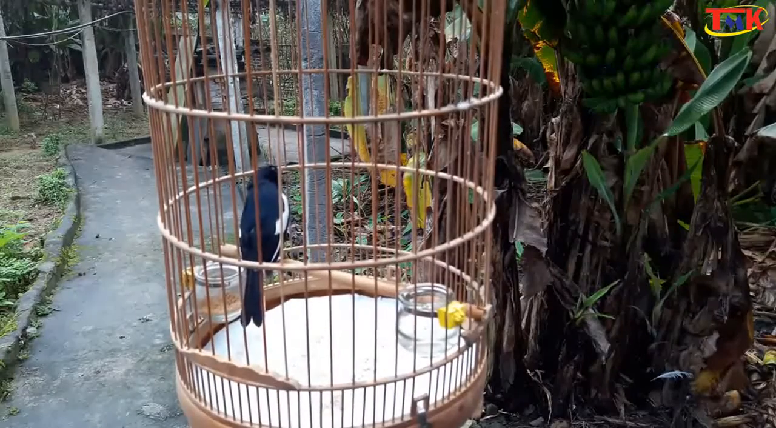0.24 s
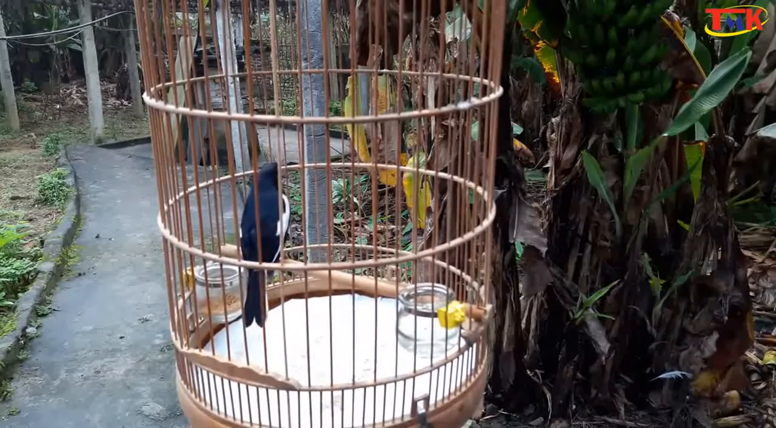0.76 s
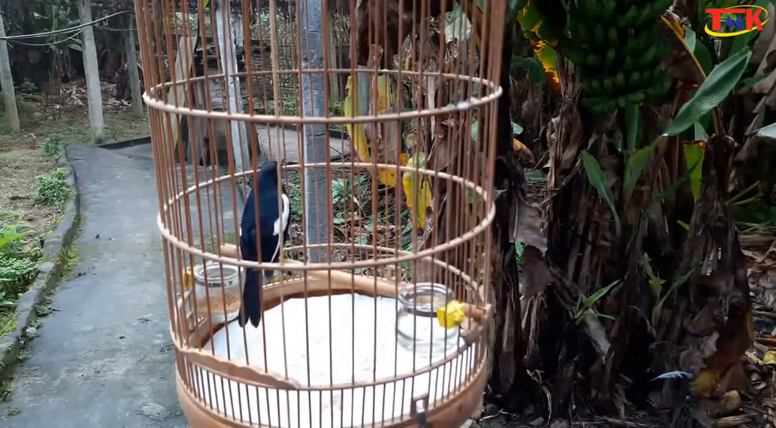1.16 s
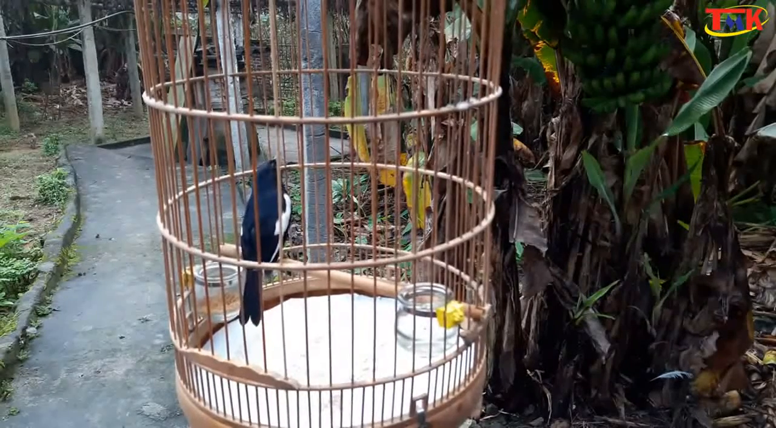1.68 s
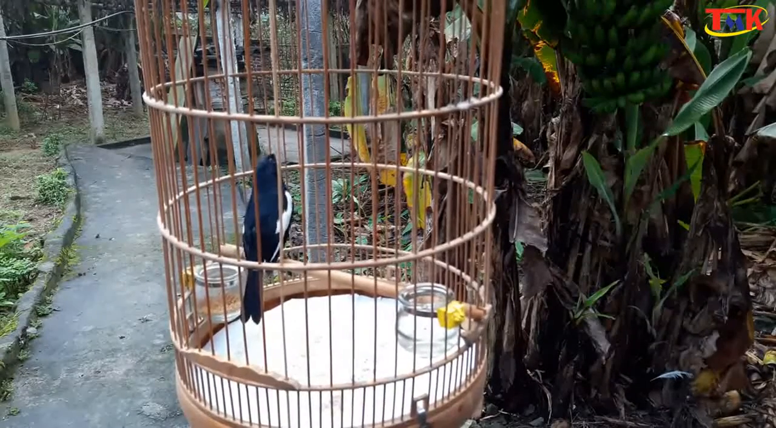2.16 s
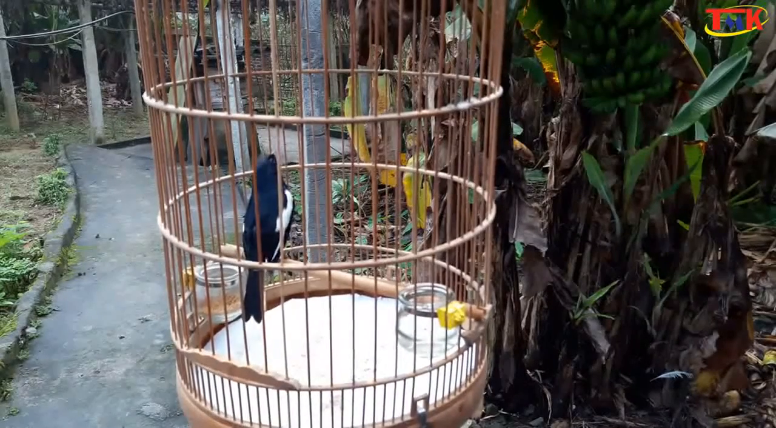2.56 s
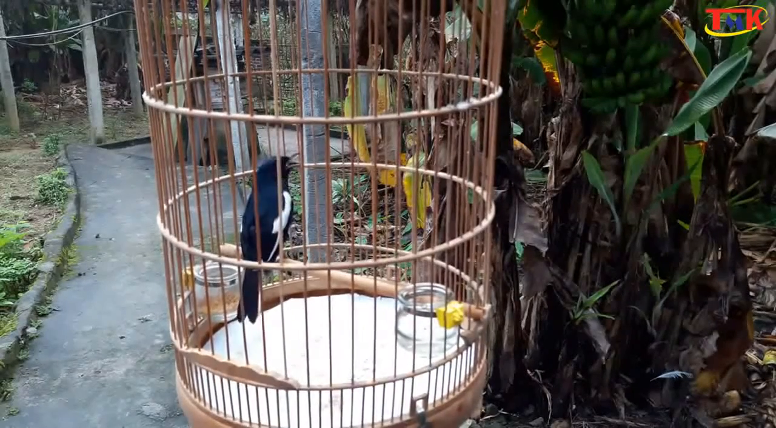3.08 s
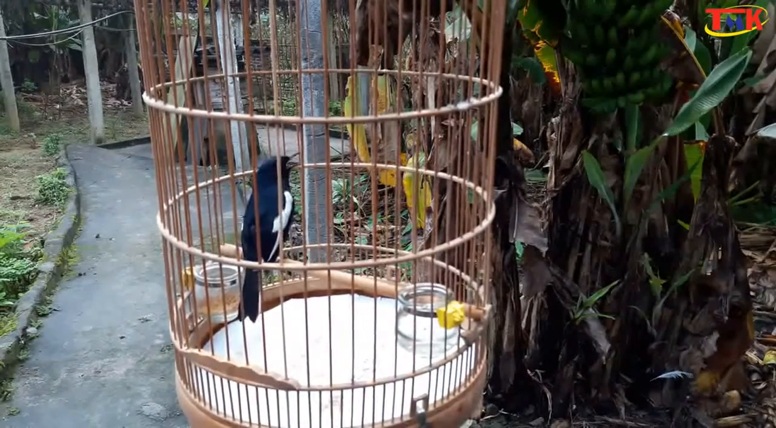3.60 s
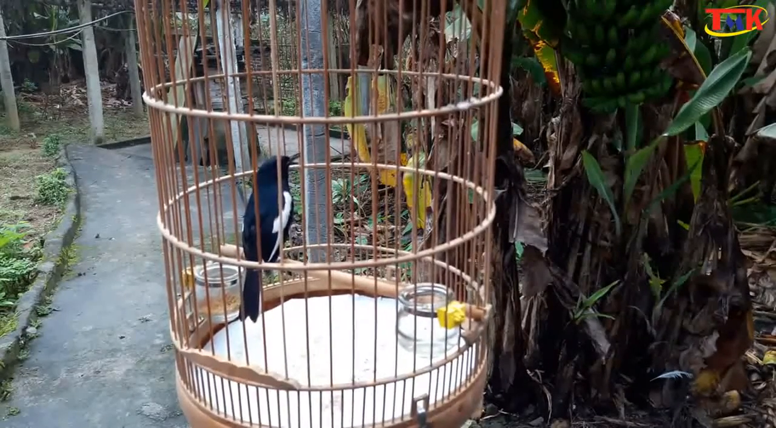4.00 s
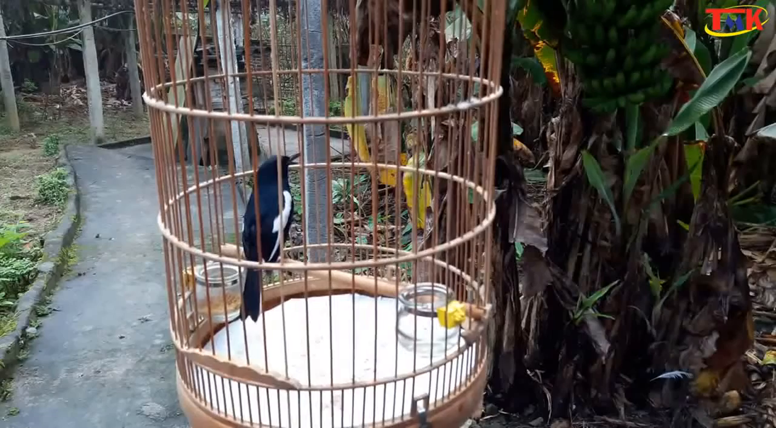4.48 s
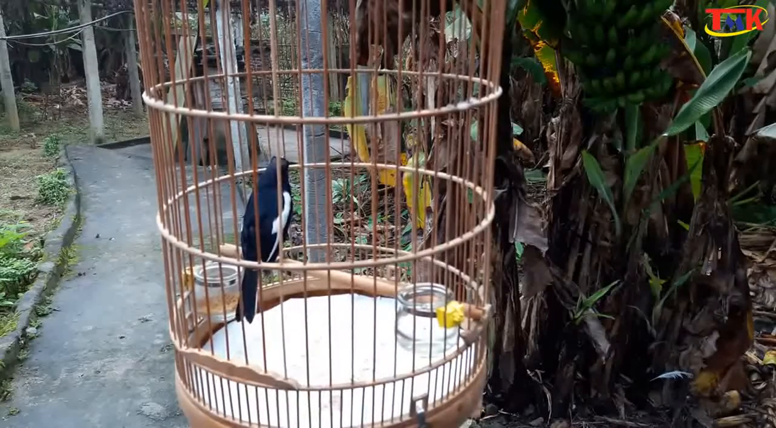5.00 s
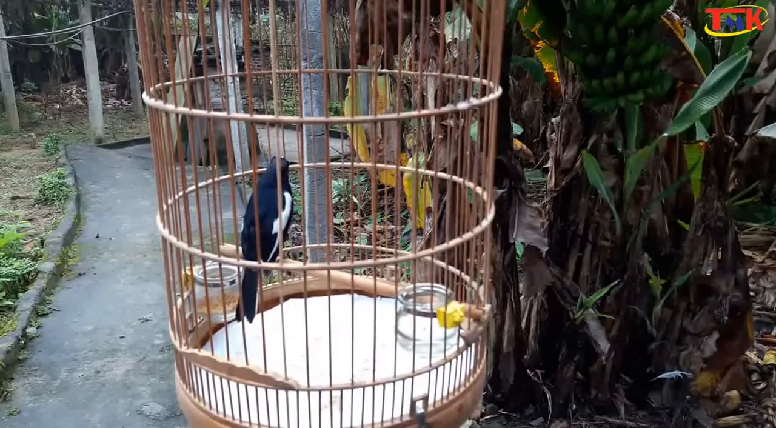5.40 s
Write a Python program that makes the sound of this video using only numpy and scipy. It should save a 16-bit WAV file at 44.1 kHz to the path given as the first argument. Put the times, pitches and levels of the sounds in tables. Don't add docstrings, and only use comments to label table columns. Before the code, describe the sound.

A caged songbird close by sings quick, piercing whistled phrases with raspy turns in a quiet garden, then abruptly stops, leaving faint rumble and hiss.

```python
import sys
import numpy as np
from scipy import signal
from scipy.fft import rfft, irfft
from scipy.io import wavfile
from scipy.ndimage import uniform_filter1d, map_coordinates

SR = 44100
rng = np.random.default_rng(int(sys.argv[2]) if len(sys.argv) > 2 else 0)


def convert_level_to_amplitude(level_db):
    exponent = np.asarray(level_db, float) / 20
    return 10 ** exponent


def wrap_up_sound(samples):
    columns = np.atleast_2d(samples).T
    tamed = np.clip(columns, -1, 1)
    steps = np.round(tamed * 32767).astype(np.int16)
    wavfile.write(sys.argv[1], SR, steps)


N = 249165

LEAP_HIGH = [
    [(.041, 4108, -44), (.067, 4187, -27), (.09, 4220, -14), (.111, 4294, -9), (.137, 4396, -10),
     (.144, 4917, -20.5)],
    [(.144, 4866, -17.5), (.149, 5608, -26.5), (.158, 6400, -33.5), (.168, 5131, -35.5), (.176, 3400, -22),
     (.184, 2720, -26), (.2, 3888, -22.5), (.209, 4418, -18.5), (.219, 5409, -38)],
]
LEAP_LOW = [
    [(0, 2450, -36.5), (.007, 3000, -15), (.027, 3170, -13.5), (.052, 3270, -7), (.066, 3280, -9),
     (.077, 3340, -20.5), (.086, 3590, -17), (.095, 4030, -24.5)],
    [(.172, 2380, -31), (.19, 2600, -31.5), (.202, 2850, -24), (.211, 3090, -20.5), (.227, 3400, -9),
     (.242, 3090, -14.5), (.254, 2800, -22.5), (.263, 2300, -26.5)],
]
STEP_HIGH = [
    [(.03, 4096, -47), (.056, 4020, -32.5), (.08, 4123, -28), (.1, 3967, -12.5), (.135, 3985, -11),
     (.165, 4015, -13), (.183, 4110, -13), (.194, 4374, -18.5)],
    [(.194, 4429, -17.5), (.207, 5250, -29.5), (.217, 4358, -18), (.226, 3040, -23), (.233, 2544, -27.5),
     (.243, 3050, -18.5), (.254, 3790, -15), (.262, 4227, -22), (.269, 5222, -21.5)],
    [(.284, 3730, -19), (.293, 2996, -10.5), (.304, 3738, -24), (.311, 4852, -36.5)],
]
STEP_LOW = [
    [(0, 2556, -35.5), (.008, 3030, -11), (.021, 3124, -11), (.043, 3192, -9.5), (.069, 3201, -7.5),
     (.08, 3150, -15), (.094, 2935, -27)],
    [(.245, 2981, -16), (.263, 2919, -25), (.277, 3098, -16), (.286, 2823, -15.5), (.294, 3012, -19.5)],
]
STAIR_HIGH = [
    [(.057, 3450, -42.5), (.065, 4014, -9.5), (.077, 3977, -12.5), (.088, 4330, -8.5), (.104, 4290, -9.5),
     (.132, 4353, -14), (.155, 4341, -5.5), (.178, 4378, -34.5)],
]
STAIR_LOW = [
    [(0, 2730, -35.5), (.009, 3130, -12.5), (.022, 2745, -24.5), (.038, 3341, -6), (.05, 3096, -16.5),
     (.058, 3434, -15.5)],
]
FLICK_HIGH = [
    [(0, 4150, -26), (.012, 4480, -15.5), (.025, 4600, -8), (.037, 4630, -9), (.046, 3300, -17),
     (.058, 2080, -24.5), (.069, 1710, -33)],
]
FLICK_LOW = [
    [(0, 2100, -38), (.012, 2600, -28), (.025, 2760, -27), (.038, 2800, -30)],
    [(.051, 4550, -27), (.061, 3950, -22), (.076, 2800, -26)],
]
BUZZ_HIGH = [
    [(0, 3800, -25), (.007, 3970, -15.5), (.03, 4150, -6.5), (.05, 4070, -11.5), (.07, 3750, -13),
     (.11, 3200, -12.5), (.13, 2990, -23)],
    [(.217, 5740, -14), (.235, 5650, -18.5), (.252, 5100, -14.5), (.27, 4650, -7.5), (.295, 4380, -9),
     (.308, 3320, -17), (.32, 2800, -19)],
    [(.346, 4410, -20), (.37, 4650, -14), (.405, 5200, -19), (.425, 5370, -19), (.445, 5190, -26),
     (.468, 4680, -6.5), (.5, 4380, -12.5), (.525, 4030, -15.5), (.538, 3210, -16.5)],
    [(.538, 3210, -6), (.552, 2870, -24), (.565, 2430, -20), (.572, 2750, -25.5), (.578, 2210, -16),
     (.587, 2940, -17), (.596, 2920, -29)],
]
BUZZ_LOW = [
    [(.235, 4387, -28), (.248, 4420, -31), (.27, 4306, -20.5), (.3, 4300, -18)],
    [(.325, 2682, -35.5), (.345, 2750, -31.5), (.36, 2865, -27), (.4, 2892, -27.5), (.43, 3200, -19),
     (.45, 3340, -16.5), (.47, 3473, -22), (.5, 3355, -28.5)],
]

# after_start_s, level_db
LEAP_EFFORT = [(-.02, -73.5), (0.068, -49), (0.128, -69.5), (0.144, -48.5), (.238, -46), (.35, -83)]
STEP_EFFORT = [(-.025, -78), (.03, -55.5), (.09, -49.5), (.148, -70.5), (.208, -51), (.24, -50),
               (.31, -46.5), (.36, -66), (.41, -73)]
STAIR_EFFORT = [(-.03, -81), (.002, -68), (0.042, -51.5), (.17, -60.5)]
FLICK_EFFORT = [(-.02, -58.5), (0.019, -46.5), (.052, -39), (0.072, -46), (0.179, -80)]
BUZZ_EFFORT = [(-.02, -85), (.06, -53), (0.072, -57), (0.166, -70), (0.205, -65), (.244, -57.5),
               (.274, -48.5), (0.414, -44), (.68, -71)]

# start_s, pitch_ratio, high_side_db, low_side_db, fastest_swell_db_per_ms
LEAPS = [
    (.419, .99, 1.8, -1.5, .8),
    (2.823, 1.005, 0.7, 1.3, 2.4),
]
STEPS = [
    (.888, 0.99, 1, -1.5, 0.84),
    (3.319, 1.001, 0.5, 0.1, 2.3),
    (3.832, .984, -0.5, 0.1, 2.8),
]
STAIRS = [
    (-.046, .986, 0.0947, 0.068, 3),
    (2.328, 1.001, 0.1, 0.1, 3),
]
FLICKS = [
    (.161, .983, -0.83, 0.084, 1.3),
    (2.553, 1.001, -1, 0.1, 2.5),
]
BUZZES = [
    (1.52, 1.001, -0.88, 0.1, 3.5),
]

SONG = [
    (LEAPS, LEAP_HIGH, LEAP_LOW, LEAP_EFFORT),
    (STEPS, STEP_HIGH, STEP_LOW, STEP_EFFORT),
    (STAIRS, STAIR_HIGH, STAIR_LOW, STAIR_EFFORT),
    (FLICKS, FLICK_HIGH, FLICK_LOW, FLICK_EFFORT),
    (BUZZES, BUZZ_HIGH, BUZZ_LOW, BUZZ_EFFORT)]


def coloured(points, channels):
    hz, db = np.transpose(points)
    gain = convert_level_to_amplitude(np.interp(np.log(np.fft.rfftfreq(N, 1 / SR) + 1), np.log(hz), db))
    x = irfft(rfft(rng.standard_normal((channels, N))) * gain, N)
    return x / np.sqrt(np.mean(x ** 2))


def walk(rate_hz):
    hold = int(SR / rate_hz)
    steps = np.repeat(rng.standard_normal(N // hold + 1), hold)
    return 1.3 * uniform_filter1d(uniform_filter1d(steps, hold), hold)[:N]


def effort_db(die_away_s=.06):
    points = sorted((row[0] + s, db) for rows, *_, effort in SONG for row in rows for s, db in effort)
    s, db = np.transpose(points)
    return np.interp(np.arange(N) / SR, np.append(s, s[-1] + die_away_s), np.append(db, -110))


def strain(full_db=-46):
    return np.minimum(convert_level_to_amplitude(effort_db() - full_db), 1) ** 2


def sung_notes(which, swell_from_db=-39, swell_lead_s=.004):
    sung = []
    for rows, *sides, _ in SONG:
        for start, ratio, *levels, swell in rows:
            for note in sides[which]:
                sung.append([(start + s, ratio * hz,
                              min(db + levels[which], swell_from_db + swell * 1e3 * (s + swell_lead_s)))
                             for s, hz, db in note])
    return sung


def membrane(notes, throbs):
    edge_s, round_s = .004, .004
    waver_hz, rough_hz, flutter_db = 9, 50, .6
    rough_swing, glide_swing, fast_glide_hz_per_s = .35, .55, 9e4
    t = np.arange(N) / SR
    notes = sorted(notes)
    s, hz, db = np.concatenate(notes).T
    s, rough = np.maximum.accumulate(s), strain()

    pitch = uniform_filter1d(np.interp(t, s, hz), int(round_s * SR))
    hurry = np.minimum(np.abs(np.gradient(pitch)) * SR / fast_glide_hz_per_s, 1)
    pitch += waver_hz * walk(150) + rough_hz * rough * walk(500)

    gate = sum(np.clip(np.minimum(t - n[0][0], n[-1][0] - t) / edge_s + .5, 0, 1) for n in notes)
    level_db = uniform_filter1d(np.interp(t, s, db), int(edge_s * SR)) + flutter_db * walk(90)
    size = np.sin(np.pi / 2 * np.minimum(gate, 1)) ** 2 * convert_level_to_amplitude(level_db)
    size *= np.abs(1 + np.maximum(rough_swing * rough, glide_swing * hurry) * walk(300))

    for start, end, rate_hz, swing_hz, depth in throbs:
        fade = np.clip(np.minimum(t - start, end - t) / 0.0067, 0, 1)
        beat = fade * np.sin(2 * np.pi * rate_hz * (t - start) + walk(70))
        pitch = pitch + swing_hz * beat
        size = size * (1 - depth * beat)
    return np.sqrt(2) * size, 2 * np.pi * np.cumsum(pitch) / SR


def bird():
    # start_s, end_s, rate_hz, pitch_swing_hz, level_swing (0-1)
    throbs = [
        (1.572, 1.652, 115, 110, .3),
    ]
    overtones = [(2, -33, -30), (3, -36.5, -42), (4, -52.5, -57)]
    # multiple of high pitch, multiple of low pitch, level_db
    mixed_tones = [(1, 1, -9), (2, -1, -17.5), (-1, 2, -15.5), (2, 1, -25), (1, 2, -24), (2, 2, -25)]
    growth, broken_db = .6, 4
    high, high_phase = membrane(sung_notes(0), throbs)
    low, low_phase = membrane(sung_notes(1), [])
    song = high * np.sin(high_phase) + low * np.sin(low_phase)
    push_db = 5 * strain()

    for k, high_db, low_db in overtones:
        audible = k * np.gradient(high_phase) < 2.6
        high_gain = convert_level_to_amplitude(high_db + push_db + broken_db * walk(60))
        low_gain = convert_level_to_amplitude(low_db + push_db + broken_db * walk(60))
        song += high_gain * high ** growth * np.sin(k * high_phase) * audible
        song += low_gain * low ** growth * np.sin(k * low_phase)

    weaker = high * low / np.sqrt(high ** 2 + low ** 2 + 1e-12)
    for m, n, db in mixed_tones:
        gain = convert_level_to_amplitude(db + push_db / 2 + broken_db * walk(80))
        song += weaker * gain * np.sin(m * high_phase + n * low_phase)
    return song


def rasp(lift_db=11, grit_db=2, scatter=2.76, patchy_db=3, count=20):
    # pitch_hz, level_db (per Hz)
    breath_colour = [(250, -13), (1200, -16.5), (2000, -6), (3500, 5.5), (5500, -3), (7000, -4),
                     (9000, -4.5), (12000, -10), (15800, -3.5)]
    effort = convert_level_to_amplitude(effort_db() + lift_db)
    air = rfft(coloured(breath_colour, channels=3))
    band = (np.sqrt(np.linspace(0, 1, N // 2 + 1)) * count).astype(int)
    patches = sum(convert_level_to_amplitude(patchy_db * walk(45)) * irfft(air * (band == k), N) for k in range(count))
    direct, left, right = patches
    return effort * convert_level_to_amplitude(grit_db * walk(250)) * direct, scatter * effort * np.array([left, right])


def surroundings(start_s=0.012):
    # delay_s, left_db, right_db
    near_echoes = [(.0035, -19, -17), (.0055, -16, -21), (.0112, -18, -15), (.017, -16, -19),
                   (.0235, -20, -18)]
    t = np.arange(SR) / SR
    scatter = rng.standard_normal((2, 2, SR)) * np.clip(t / start_s - .5, 0, 1)
    h = 0
    for grains, decay_s, db in zip(scatter, (.28, 1.0), (-15, -36)):
        tail = grains * np.exp(-np.log(1000) * t / decay_s)
        h = h + convert_level_to_amplitude(db) * tail / np.sqrt(np.sum(tail ** 2, axis=1, keepdims=True))
    for delay_s, left_db, right_db in near_echoes:
        h[:, int(delay_s * SR)] += convert_level_to_amplitude(np.array([left_db, right_db]))
    return h


def garden(bass_hz=520, alike_share=.87, hum_waver_hz=4, level_db=-57, flicker_db=.6):
    # pitch_hz, level_db (per Hz)
    garden_colour = [(18, -46), (30, -14.5), (100, -2.5), (215, -6), (245, 1.5), (280, -10), (384, -5),
                     (415, -11), (721, -7.5), (1350, -15.5), (1590, -15), (2120, -13.5), (3220, -22),
                     (9970, -21.5), (16000, -23.5)]
    # pitch_hz, level_db
    hum_lines = [(247.6, -76.5), (710.6, -71), (855.9, -69.5), (904.4, -72), (1949, -74.5), (2153, -75.5),
                 (5852, -91), (7806, -90.5), (9803, -86), (11768, -77)]
    mid, other = coloured(garden_colour, channels=2)
    hz = np.fft.rfftfreq(N, 1 / SR)
    alike = alike_share / (1 + (hz / bass_hz) ** 4)
    shared = rfft(mid) * np.sqrt(1 + alike)
    differing = rfft(other) * np.sqrt(1 - alike)
    bed = irfft(np.array([shared + differing, shared - differing]), N)
    bed = bed * convert_level_to_amplitude(level_db + flicker_db * walk(4))
    hum = [[convert_level_to_amplitude(db) * np.sin(2 * np.pi * np.cumsum(f + hum_waver_hz * walk(27)) / SR)
            for f, db in hum_lines] for _ in bed]
    return bed + 2 * np.sum(hum, axis=1)


def drop_weak_bands(x, size=2048, count=44):
    # start_s, end_s
    bass_lost = [
        (.2, .245),
        (1.8, 2.03),
        (2.575, 2.61),
        (2.93, 3.05),
    ]
    # start_s, end_s, ceiling_hz
    ceilings = [
        (0, 6, 15900),
        (.1, .4, 14200),
        (.53, .72, 13000),
        (1.64, 2.05, 14600),
        (2.3, 3.05, 13500),
        (3.16, 3.3, 14500),
    ]
    bass_top_hz, loud_db, weak_db = 1200, -32, -30
    hz, t, z = signal.stft(x, SR, nperseg=size, noverlap=size * 3 // 4)
    band = (count * np.log1p(hz / 900) / np.log1p(SR / 1800)).astype(int)
    band = np.minimum(band, count - 1)
    power = np.array([np.sum(np.abs(z[:, band == k]) ** 2, axis=(0, 1)) for k in range(count)])
    level_db = 10 * np.log10(power + 1e-18)
    loudest_db = level_db.max(0)

    frame = (np.arange(len(t)) + rng.integers(0, 6, (count, 1))) // 6
    luck = np.take_along_axis(rng.random((count, len(t))), frame, axis=1)
    above = np.arange(count)[:, None] - level_db.argmax(0)
    share = np.where((above > 2) & (above < 6), .75, .25)
    lost = (luck < share) & (loudest_db > loud_db) & (level_db < loudest_db + weak_db)
    lost = lost[band]

    for start, end in bass_lost:
        during = (t > start - .012) & (t < end + .012)
        lost |= np.outer(hz < bass_top_hz, during) & (luck < .93)[band]
    for start, end, top_hz in ceilings:
        lost |= np.outer(hz > top_hz, (t >= start) & (t < end))
    return signal.istft(z * ~lost, SR, nperseg=size, noverlap=size * 3 // 4)[1][:, :N]


def scene():
    # start_s, left_minus_right_db
    head_turns = [(0.0, 1), (0.28, 1.5), (0.34, 4.5), (0.69, 2), (0.79, 5.5), (1.22, -1), (2.39, 4.5),
                  (2.56, -1.5), (3.47, -2.5), (3.7, 5), (4.01, -2), (4.2, 9)]
    beak_hz, right_lag_s, song_db = 1250, 7.7e-5, -2
    air, scattered = rasp()
    beak = signal.butter(4, beak_hz, "high", fs=SR, output="sos")
    song = signal.sosfilt(beak, bird()) + air
    s, pan_db = np.transpose(head_turns)
    turn = convert_level_to_amplitude(np.interp(np.arange(N) / SR, s, pan_db) / 2)
    late = map_coordinates(song, [np.arange(N) - right_lag_s * SR], mode="mirror")
    ports = np.array([song, late])
    echoes = signal.fftconvolve(ports, surroundings(), axes=1)[:, :N]
    return convert_level_to_amplitude(song_db) * (ports * np.array([turn, 1 / turn]) + echoes + scattered) + garden()


def band_limit(x):
    return signal.sosfilt(signal.butter(12, 16150, fs=SR, output="sos"), x)


def record(dry):
    mix = drop_weak_bands(dry)
    return band_limit(mix)


dry = scene()
out = record(dry)
wrap_up_sound(out)
```